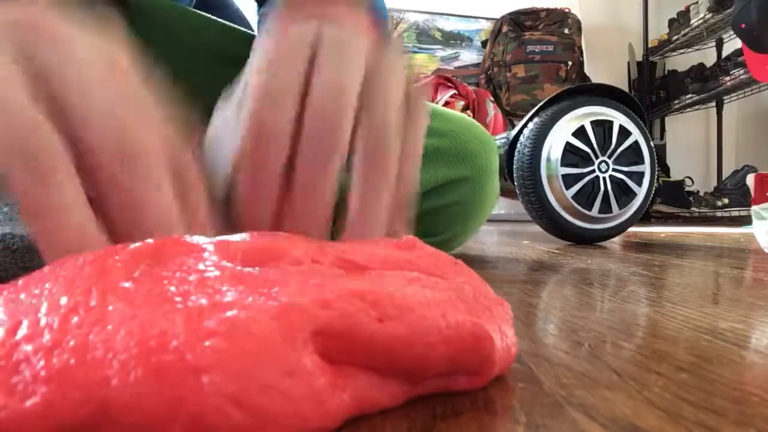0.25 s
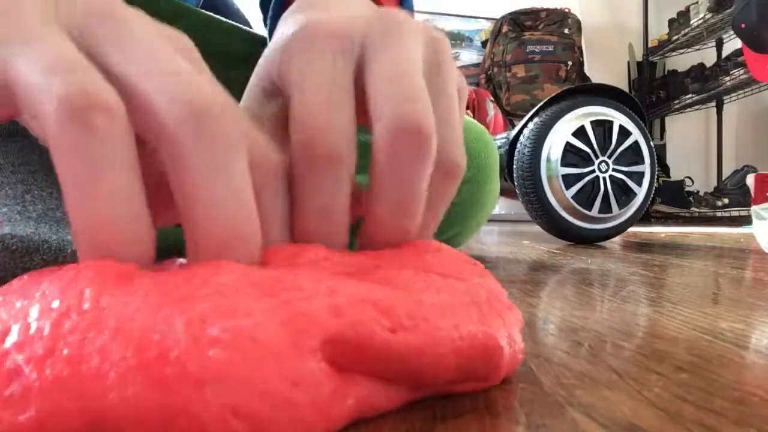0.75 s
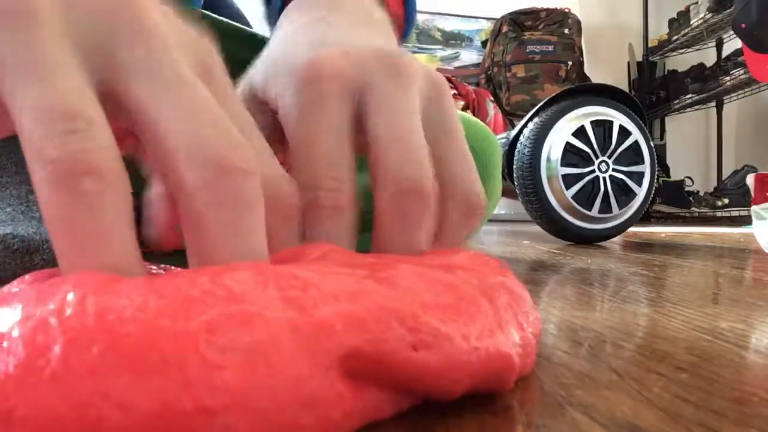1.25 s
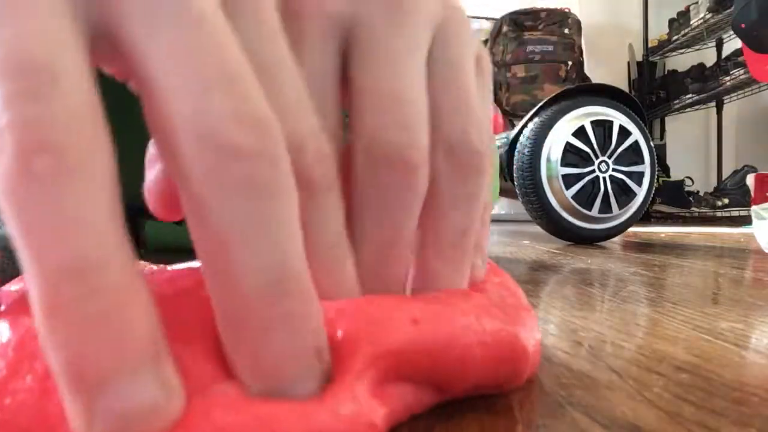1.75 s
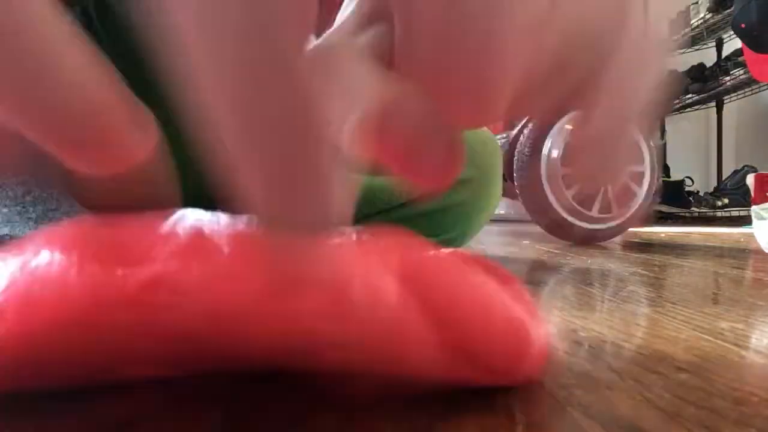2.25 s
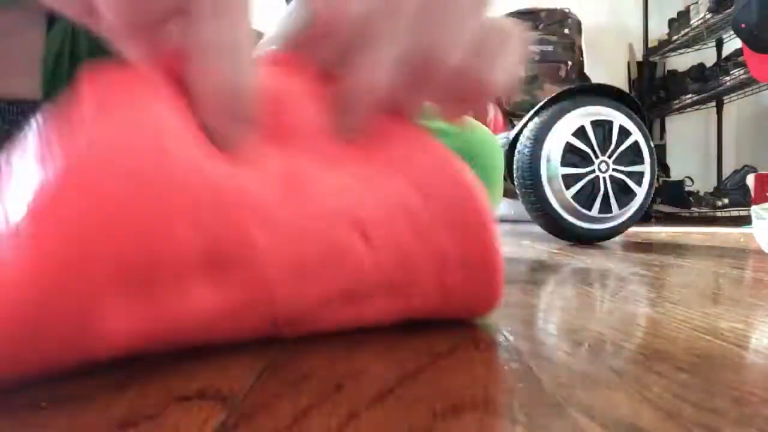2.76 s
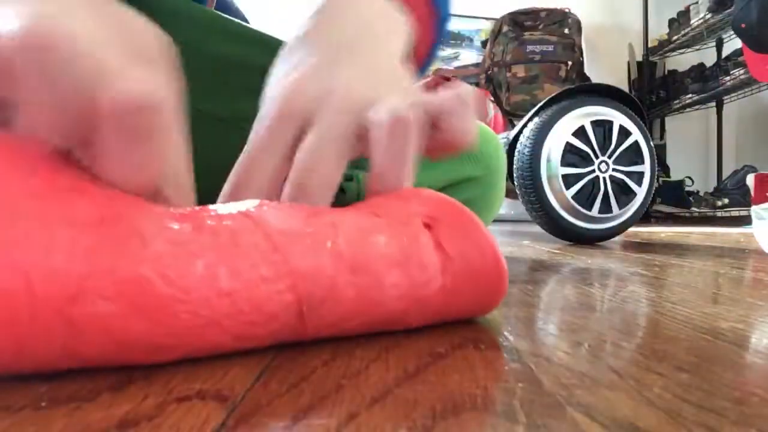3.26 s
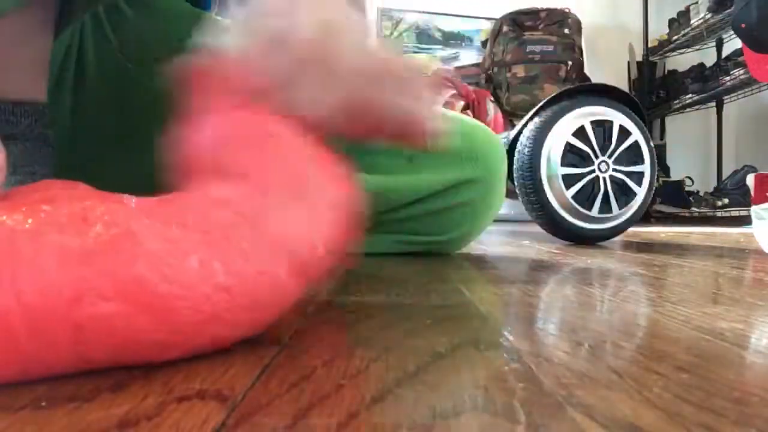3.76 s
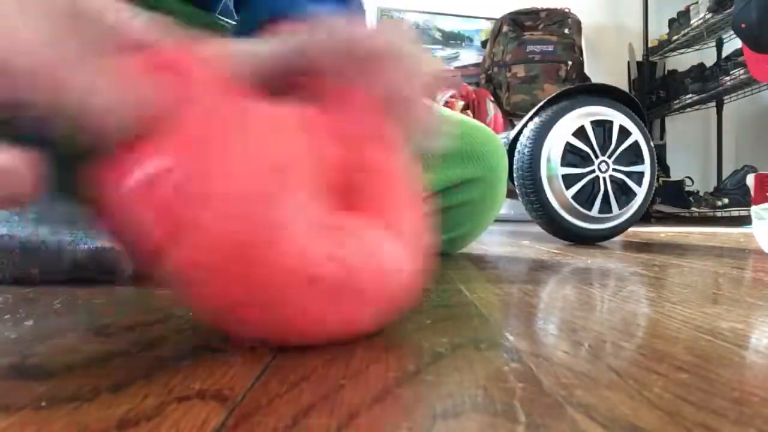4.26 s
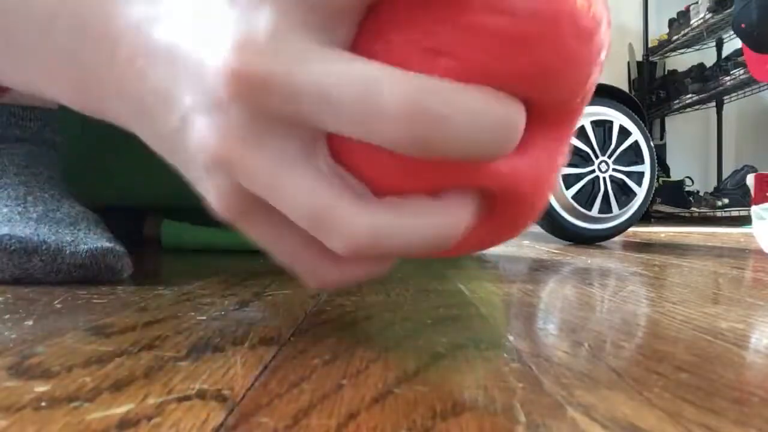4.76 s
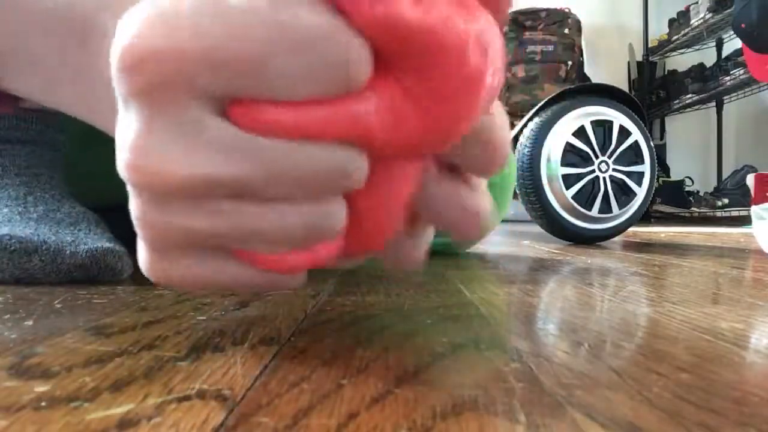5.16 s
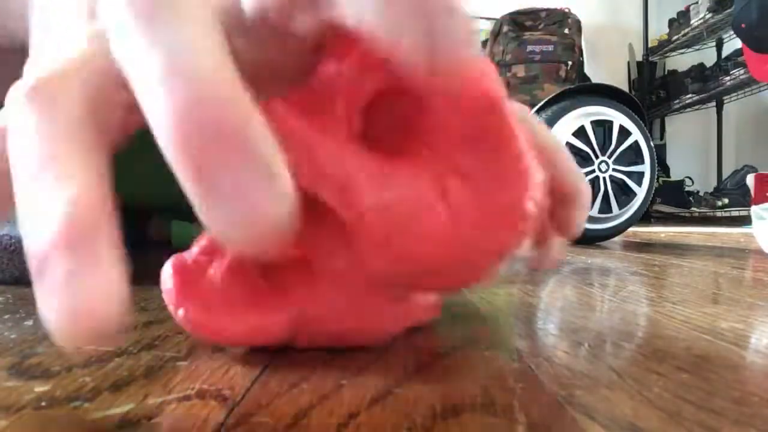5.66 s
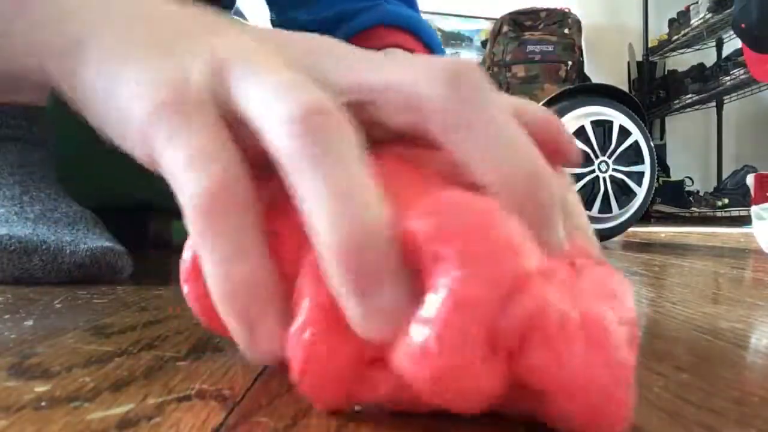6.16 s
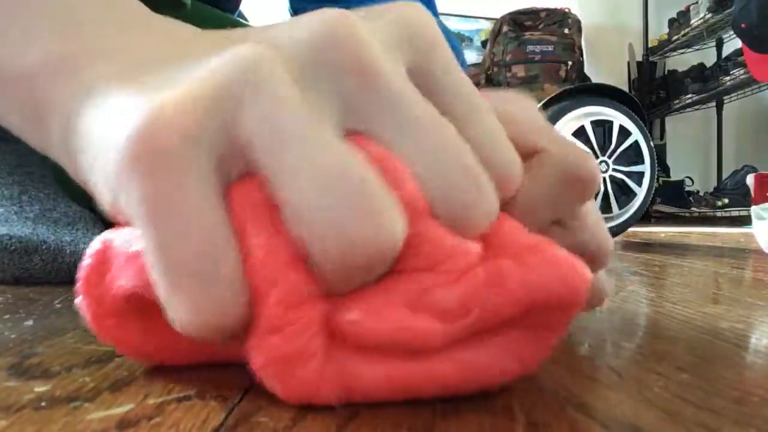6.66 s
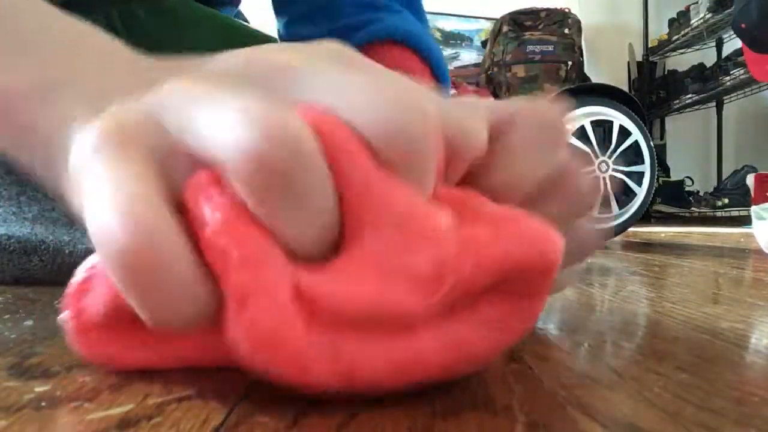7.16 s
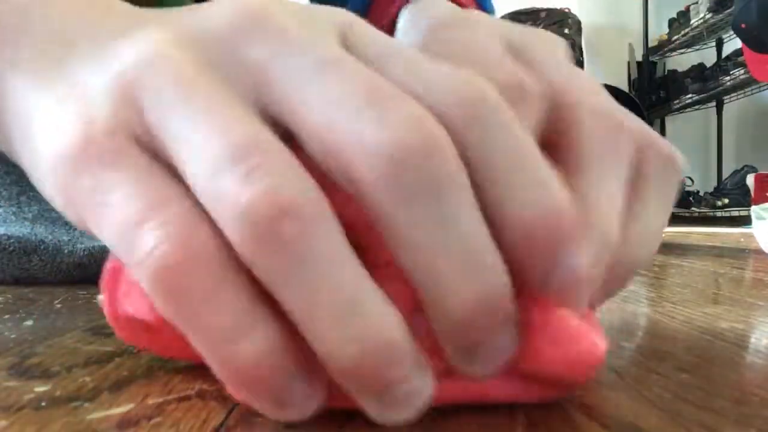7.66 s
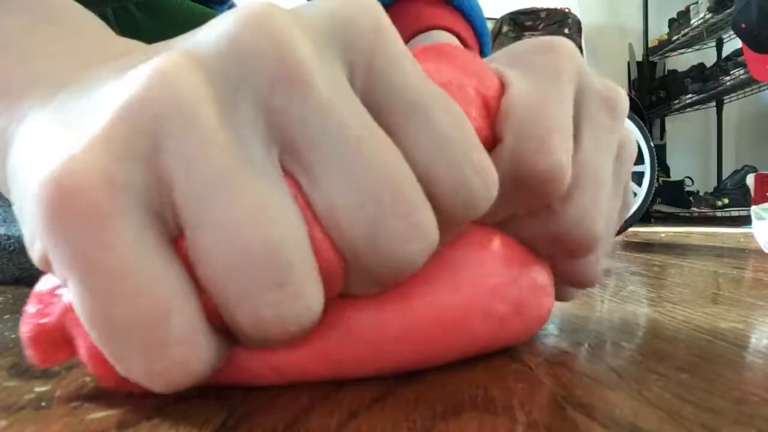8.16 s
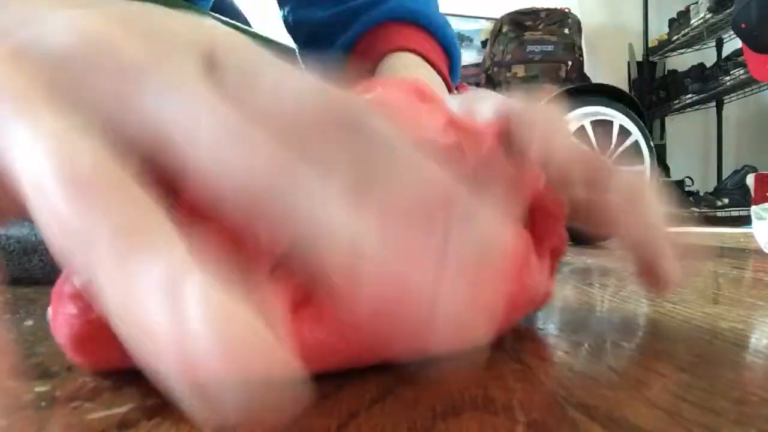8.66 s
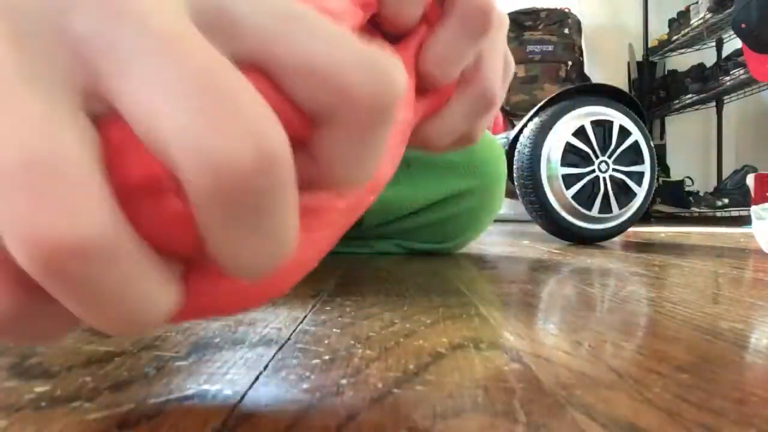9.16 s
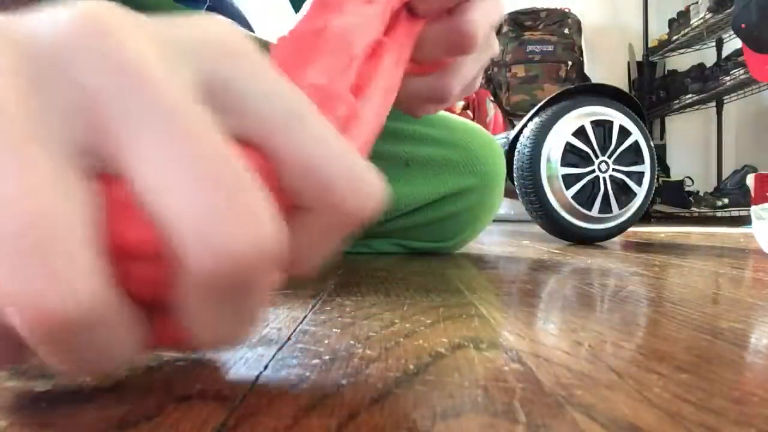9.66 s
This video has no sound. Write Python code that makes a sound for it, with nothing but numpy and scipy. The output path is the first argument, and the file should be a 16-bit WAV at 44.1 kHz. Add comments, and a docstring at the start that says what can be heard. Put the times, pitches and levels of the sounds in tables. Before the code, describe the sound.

Fingers poke and peel away from sticky slime with wet, tearing squelches, hollow plops and bright snaps. The lump thumps softly on wooden boards and is turned over, then squeezed in crackling bursts. The loudest cluster of bubble pops comes near the end, followed by a peel and faint stretching ticks. Heard very close in a quiet room with faint hum.

```python
"""A lump of slime is poked, kneaded and stretched by hands on a wooden floor, heard close up in a quiet room.
Bursting bubbles snap as short dispersed impulses, and opening air pockets plop as resonators sinking in pitch.
Peeling and kneading are random swarms of pockets, breaking threads and tiny bubbles under level curves.
Filtered noise gives the thuds on the boards and the still air; a wavering sine is the faint mains hum."""
import sys
import numpy as np
from scipy import signal
from scipy.fft import rfft, irfft, next_fast_len
from scipy.io import wavfile
from scipy.ndimage import map_coordinates

SR = 44100
rng = np.random.default_rng(int(sys.argv[2]) if len(sys.argv) > 2 else 0)


def wrap_up_sound(samples):
    """Save the sound to the file named by the first command line argument, as 16-bit audio."""
    columns = np.atleast_2d(samples).T
    # keep every value between -1 and 1, then stretch to whole-number steps
    tamed = np.clip(columns, -1, 1)
    steps = np.round(tamed * 32767).astype(np.int16)
    wavfile.write(sys.argv[1], SR, steps)


N = 437031  # samples

# frequency response shared by all bursting bubbles: f/Hz, level/dB
BUBBLE_COLOUR = [(100, 6), (2000, 1), (3600, 0), (5000, -3), (7000, 1), (9500, 1.5), (10400, -0.5),
                 (11500, 3.5), (16000, -3)]


def amp(db):
    """Level to amplitude: 20 dB is a factor of ten."""
    return 10 ** (np.asarray(db) / 20)


def unit(x):
    """Normalisation to an rms value of 1."""
    return x / np.sqrt(np.mean(x ** 2) + 1e-20)


def along(points, hz):
    """Linear interpolation of (f/Hz, value) points over the logarithm of frequency."""
    f, v = np.transpose(points)
    return np.interp(np.log(hz + 1), np.log(f + 1), v)


def coloured(x, spectrum):
    """Minimum-phase filtering: folding the cepstrum makes the filter causal, so attacks stay sharp."""
    m = 2 ** 13
    level_db = along(spectrum, np.fft.rfftfreq(m, 1 / SR))
    cepstrum = irfft(np.log(amp(level_db)), m)
    cepstrum[1:m // 2] *= 2
    cepstrum[m // 2 + 1:] = 0
    impulse_response = irfft(np.exp(rfft(cepstrum)), m)
    return signal.fftconvolve(x, impulse_response)[:N]


def add(track, s, sound):
    """Superposition: a sound is summed into the track from time s, in seconds."""
    part = track[max(0, round(s * SR)):][:len(sound)]
    part += sound[:len(part)]


def wobble(rate):
    """A smooth random curve: a spline through normally distributed knots, rate of them a second."""
    knots = rng.standard_normal(int(N * rate / SR) + 4)
    return map_coordinates(knots, [np.arange(N) * rate / SR])


def pocket(t, hz, cycles, drop):
    """Cavity resonance: an air pocket rings for a cycle or two and its pitch sinks as it widens."""
    age = t * hz / cycles
    # the pitch glides from (1 + drop) * hz towards (1 - drop) * hz
    phase = cycles * ((1 - drop) * age + 2 * drop * np.log1p(age))
    envelope = 2 * age * np.exp(1 - 2 * age)
    return np.sin(2 * np.pi * phase) * envelope


def pockets(rate, centre_hz, octaves, spread_db, cycles):
    """Granular superposition: rate small air pockets a second, of many sizes, scaled to rms 1."""
    when, a, b, strength = rng.random((int(rate * N / SR), 4)).T[..., None]
    hz = centre_hz * 2 ** (octaves * (a + b - 1))
    size = amp(spread_db * np.minimum(-np.log(strength), 3.5))
    k = np.arange(SR // 150)
    fade = 1 - (k / len(k)) ** 2
    grains = size * pocket(k / SR, hz, cycles, drop=0.24) * fade
    places = (when * N).astype(int) + k
    return unit(np.bincount(places.ravel(), grains.ravel(), N)[:N])


def ticks(rate, spread_db):
    """Impulse noise: threads of slime break at random moments, most of them weakly."""
    when, strength, sign = rng.random((int(rate * N / SR), 3)).T
    size = amp(spread_db * np.minimum(-np.log(strength), 4))
    return np.bincount((when * N).astype(int), size * np.sign(sign - .5), N)


def background():
    """Stationary sources: a slowly wavering mains tone and the broadband noise of still room air."""
    # spectrum of the air: f/Hz, level/dB
    air_spectrum = [(20, -19), (64, -5), (200, -12.5), (450, -22.5), (900, -21.5), (4500, -34),
                    (16000, -40.5)]
    tone = np.sqrt(2) * np.sin(2 * np.pi * 60 * np.arange(N) / SR)
    hum = amp(-64.5 + 2 * wobble(5.5)) * tone
    return hum + amp(-64.5) * unit(coloured(rng.standard_normal(N), air_spectrum))


def peels():
    """Adhesive failure: skin lifts off in jerks as pockets open and threads tear, then comes free."""
    # pulls of the skin: t/s at full pull, level/dB, rise/s over the last 20 dB, hold/s, tear brightness/dB
    pulls = [(0.316, -30, 0.022, 0.031, -2.5), (1.391, -29.5, 0.021, 0.027, -3),
             (2.295, -32, 0.038, 0.036, 7.5), (3.381, -35.5, 0.01, 0.046, 2.5),
             (5.616, -32.5, 0.14, 0.029, 5), (7.239, -32, 0.082, 0.098, 2), (8.584, -29, 0.062, 0.031, 5.5)]
    # spectra of the wet opening and of the tearing: f/Hz, level/dB
    squelch_spectrum = [(150, 2.5), (500, -5), (1100, -3), (2000, -9), (5000, -26), (15000, -49.5)]
    tear_spectrum = [(500, -20.5), (1500, 1), (3000, -0.5), (5000, -4), (11000, -7), (16000, -15)]
    settle_start_db, settle_s = -1.5, 0.046  # the sinking slime lingers: level, time to lose 20 dB
    t = np.arange(N) / SR
    wet, bright = np.zeros(N), np.zeros(N)
    for s, db, rise, hold, bright_db in pulls:
        swell_db = -20 * np.clip((s - t) / rise, 0, 10) ** 1.5
        sag_db = -4 * np.clip((t - s) / hold, 0, 1)
        free_db = -20 * np.clip((t - s - hold) / 0.028, 0, 10)
        settle_db = settle_start_db - 20 * np.clip((t - s - hold) / settle_s, 0, 10)
        pull_db = db + swell_db + sag_db
        wet += amp(pull_db + np.maximum(free_db, settle_db))
        bright += amp(pull_db + free_db + bright_db)
    swarm = pockets(rate=600, centre_hz=650, octaves=2.18, spread_db=2.0, cycles=2.64)
    squelch = unit(coloured(swarm, squelch_spectrum))
    tear = unit(coloured(ticks(rate=2400, spread_db=1.0), tear_spectrum))
    jerks = amp(2.8 * wobble(150))
    return jerks * (amp(-3.0) * wet * squelch + amp(-7.5) * bright * tear)


def snap(hz):
    """Dispersed impulse of energy 1: the skin cracks, the pitch dives as the cavity opens, the rim flutters."""
    crack_octaves, dive_cycles = 0.71, 0.595  # width; cycles while the pitch sinks by a factor e
    middle_cavity_hz, cavity_db, cavity_octaves = 1300, -4.5, 1.47  # the level is for a 5 kHz bubble
    t = np.arange(SR // 50) / SR
    f = np.fft.rfftfreq(len(t), 1 / SR) + 1
    crack = 1 / (1 + (np.log2(f / hz) / crack_octaves) ** 2)
    cavity_hz = middle_cavity_hz * np.exp(0.14 * rng.standard_normal())
    size = (5000 / hz) ** .7  # big bubbles have more body
    cavity = amp(cavity_db) * size / (1 + (np.log2(f / cavity_hz) / cavity_octaves) ** 2)
    # this phase delays low frequencies more than high ones
    dispersion = np.exp(-2j * np.pi * dive_cycles * np.log(f))
    dive = irfft((crack + cavity) * dispersion, len(t))[:len(t) // 2]
    flutter_decay = amp(-22.5) * np.exp(-t / 0.001) + 0.012 * np.exp(-t / 0.0079)
    flutter = rng.standard_normal(len(t)) * flutter_decay
    sound = np.convolve(dive, (t == 0) + flutter)
    return sound / np.linalg.norm(sound)


def snaps():
    """Impulsive release: trapped bubbles burst under the fingers, all with one common colouring."""
    # bursting bubbles: t/s, energy level/dB ahead of the common colouring, centre f/Hz
    bursts = [(0.305, -14, 4930), (0.3125, -2.5, 3730), (0.3235, -9.5, 5400), (0.8434, -27.5, 4200),
              (0.9948, -20, 6250), (1.0745, -2.5, 15300), (1.2956, -16.5, 15000), (1.7935, -15.5, 3100),
              (1.8374, -22, 5950), (2.391, -3.5, 1650), (2.584, -10.5, 5300), (3.3907, -4.5, 2870),
              (3.9563, -20.5, 3840), (4.0237, -18.5, 2500), (4.0779, -20.5, 3500), (4.0935, -15.5, 2520),
              (4.18, -19.5, 5560), (4.3997, -24, 1890), (4.802, -22, 2500), (4.816, -19, 2960),
              (5.065, -20, 7000), (5.0884, -15, 7040), (5.1923, -14.5, 5600), (5.2071, -9.5, 5260),
              (5.2642, -7, 2350), (5.275, -5.5, 4030), (5.311, -16.5, 4100), (5.328, -6, 4800),
              (5.3399, 5, 6000), (6.198, -20, 5780), (6.4953, -21, 1960), (6.601, -17, 1780),
              (6.665, -17, 8260), (6.685, -11.5, 6300), (6.7142, -13.5, 4800), (6.776, -14.5, 2400),
              (6.8187, -15.5, 5200), (6.847, -12, 4560), (6.8799, -12, 5270), (6.906, -18, 7640),
              (7.0103, -16.5, 7400), (7.6047, -22.5, 3570), (7.7425, 5.5, 8060), (7.7594, -10, 6500),
              (7.8299, -4, 7300), (7.8967, -13, 7870), (7.9491, -14, 5500), (8.026, -13, 6550),
              (8.0559, -20.5, 4200), (8.0902, -10.5, 6350), (8.1249, 7, 6960), (8.1379, 6.5, 4900),
              (8.2087, 4.5, 7000), (8.2286, -5.5, 6960), (8.2732, -0.5, 10630), (8.2855, 8.5, 3080),
              (8.2915, 0, 7160), (8.2945, -2, 7000), (8.305, 8, 4640), (8.3334, -3, 6600),
              (8.3846, 2, 10640), (8.4292, -.5, 5770), (8.9014, -26.5, 1620), (8.9896, -27, 3420),
              (9.1551, -23.5, 1200), (9.2092, -24, 11100), (9.2353, -19, 1680), (9.3445, -19.5, 10800),
              (9.5224, -20, 11300), (9.5443, -24, 11830), (9.6666, -28.5, 9700), (9.7238, -31.5, 1600),
              (9.7653, -29, 7200), (9.9, -17.5, 4500)]
    out = np.zeros(N)
    for s, db, hz in bursts:
        add(out, s, amp(db) * snap(hz))
    return coloured(out, BUBBLE_COLOUR)


def room(x):
    """Reverberation: furniture and walls return a faint, short tail whose colour turns steadily over time."""
    # reverberation time of the room: f/Hz, t60/s
    decay_times = [(150, 0.66), (1000, 0.31), (6000, 0.41), (15000, 0.16)]
    hz, t, z = signal.stft(rng.standard_normal((3, SR // 2)), SR, nperseg=256)
    decay = amp(-60 * t / along(decay_times, hz)[:, None])
    tails = signal.istft(z * decay, SR, nperseg=256)[1]
    first_delay = SR // 300  # samples
    tails = np.pad(tails / np.linalg.norm(tails[0]), ((0, 0), (first_delay, 0)))
    # three weights in rotation share the sound among three tails at constant total power
    turn = 2.3 * np.arange(N) / SR + np.arange(3)[:, None] / 3
    place = np.cos(np.pi * turn) * np.sqrt(2 / 3)
    return signal.fftconvolve(place * x, tails, axes=1)[:, :N].sum(axis=0)


def plops():
    """Cavity resonance: larger pockets open and plop; through a narrow opening they ring longer and squeak."""
    # air pockets opening: t/s, envelope peak level/dB, f/Hz
    openings = [(0.316, -33, 486), (1.379, -24, 1260), (1.38, -25.5, 440), (1.397, -16, 500),
                (1.416, -26.5, 454), (2.264, -28.5, 1240), (2.390, -14, 1130), (2.491, -31.5, 138),
                (3.392, -25, 400), (3.396, -22.5, 219), (3.412, -27, 447), (3.619, -41, 183),
                (4.024, -40.5, 307), (4.472, -39, 278), (5.524, -30, 487), (5.558, -31, 303),
                (5.621, -23, 1110), (7.248, -22.5, 553), (7.301, -22.5, 880), (8.123, -28.5, 188),
                (8.138, -24, 683), (8.286, -34, 169), (8.307, -37, 150), (8.575, -22, 650)]
    # air squeaking out through a narrow opening: t/s, envelope peak level/dB, f/Hz
    narrow_openings = [(4.202, -37, 1650), (6.044, -42.5, 1620), (9.448, -31, 1350)]
    out, t = np.zeros(N), np.arange(SR // 12) / SR
    for s, db, hz in openings:
        add(out, s, amp(db) * pocket(t, hz, cycles=1.4, drop=.4))
    for s, db, hz in narrow_openings:
        add(out, s, amp(db) * pocket(t, hz, cycles=2.6, drop=.22))
    return out


def swell(s, db, half):
    """A cusped level curve in dB about time s, 14 dB down at the half length."""
    distance = np.abs((np.arange(N) / SR - s) / half)
    return db - 14 * distance ** 0.66


def handwork():
    """Effort and cling in dB: the powers of all moves add, and cling is their power-weighted mean."""
    # slow squeezes: start t/s, let-go t/s, final level/dB, rise from start to let-go/dB (negative: a fall),
    # cling/dB (favours crackle over squish)
    squeezes = [(0.72, 1.36, -67, 5.5, -1), (1.683, 2.2, -72.5, -4, 4), (3.634, 4.45, -85, -11, 15),
                (4.804, 5.365, -51.5, 10.5, 1), (5.432, 5.8, -60, 12, -0.5), (6.341, 6.89, -56.5, 4, 1.5),
                (6.926, 7.205, -67.5, -10, 5), (7.595, 8.339, -44, 18.5, 5.5), (8.92, 9.92, -72.5, -5, 7.5)]
    # quick strokes that poke, roll and turn the lump: t/s, peak level/dB, half length/s
    strokes = [(0.853, -50, 0.014), (2.604, -45.5, 0.067), (2.709, -48.5, 0.043), (2.793, -45.5, 0.032),
               (2.989, -58.5, 0.14), (3.776, -55, 0.19), (3.922, -44.5, 0.013), (3.996, -49.5, 0.059),
               (4.216, -43, 0.014), (4.3, -53, 0.19), (4.608, -50.5, 0.048), (4.666, -50.5, 0.027),
               (4.815, -57, 0.066), (4.937, -45.5, 0.012), (5.692, -38.5, 0.015), (5.938, -56, 0.031),
               (6.078, -53.5, 0.018), (6.232, -47.5, 0.028), (8.837, -49, 0.078)]
    grip_db_per_s, let_go_db_per_s, stroke_cling_db = 445, 270.5, 0
    t = np.arange(N) / SR
    moves = []
    for start, end, db, build_db, cling_db in squeezes:
        pressure_db = db - build_db * np.clip((end - t) / (end - start), 0, 1)
        grip_db = grip_db_per_s * np.maximum(start - t, 0)
        let_go_db = let_go_db_per_s * np.maximum(t - end, 0)
        moves.append((pressure_db - grip_db - let_go_db, cling_db))
    for s, db, half in strokes:
        moves.append((swell(s, db, half), stroke_cling_db))
    power, cling = np.zeros(N), np.zeros(N)
    for level_db, cling_db in moves:
        share = amp(np.maximum(level_db, -120)) ** 2
        power += share
        cling += share * cling_db
    return 10 * np.log10(power), cling / power


def pinpricks(level_db, rate, spread_db):
    """Random impulsive release: tiny bubbles of assorted sizes burst, rate of them a second."""
    lowest_hz, octaves = 1764, 2.34  # centre of the largest bubbles, range of sizes
    out = np.zeros(N)
    for when, strength, pitch in rng.random((int(rate * N / SR), 3)):
        db = level_db[int(when * N)] + spread_db * strength ** 2
        add(out, when * N / SR, amp(db) * snap(lowest_hz * 2 ** (octaves * pitch)))
    return coloured(out, BUBBLE_COLOUR)


def kneading():
    """Stick-slip: pressed slime squishes; where it clings, separate threads and pinpricks take over."""
    # spectra of the squish and of the breaking threads: f/Hz, level/dB
    squish_spectrum = [(100, 2.5), (250, 0), (1400, 0.5), (3000, -8), (6000, -20), (15000, -38.5)]
    crackle_spectrum = [(600, -12.5), (2000, -1), (3600, -4), (5000, -4.5), (7000, -3.5), (13000, -7),
                        (16000, -18.5)]
    squish_db, threads_db, pops_db, blips_db = -1, -0.5, 20, -3.5  # each layer against the effort
    effort_db, cling_db = handwork()
    slip_db = 2 * wobble(28) + 2.8 * wobble(170)
    swarm = pockets(rate=450, centre_hz=1100, octaves=2.4, spread_db=4, cycles=1.4)
    squish_gain = amp(effort_db + slip_db - 1.1 * cling_db + squish_db)
    squish = squish_gain * unit(coloured(swarm, squish_spectrum))
    threads_gain = amp(effort_db + slip_db + 0.055 * cling_db + threads_db)
    threads = threads_gain * unit(coloured(ticks(rate=2000, spread_db=0.7), crackle_spectrum))
    pops = pinpricks(effort_db + cling_db + pops_db, rate=100, spread_db=14)
    stray = pockets(rate=60, centre_hz=1250, octaves=1.6, spread_db=3, cycles=1.3)
    blips = amp(effort_db + blips_db) * stray
    return squish + blips + threads + pops


def bumps():
    """Damped impact: the soft lump lands on the boards as a dull noise burst with exponential decay."""
    # landings: t/s, nominal peak level/dB
    landings = [(1.424, -31.5), (2.333, -29), (2.391, -26.5), (2.511, -37.5), (3.396, -35), (8.799, -37.5)]
    # response of the floorboards: f/Hz, level/dB
    boards_response = [(25, -15), (60, -7), (150, -6), (260, -11.5), (600, -34), (3000, -43)]
    out, t = np.zeros(N), np.arange(SR // 6) / SR
    for s, db in landings:
        # 22.5 dB makes up for the loss in the boards
        add(out, s, amp(db + 22.5) * np.exp(-t / 0.015) * rng.standard_normal(len(t)))
    return coloured(out, boards_response)


def drags():
    """Amplitude modulation: the lump drags as it is turned over, a swarm of low pockets gurgling wetly."""
    # drags over the boards: t/s, peak level/dB, half length/s
    turns = [(4.502, -51.5, 0.034), (4.886, -37.5, 0.013), (4.948, -45.5, 0.02)]
    gurgle = pockets(rate=500, centre_hz=323, octaves=0.94, spread_db=2, cycles=2.2)
    return sum(amp(swell(*row)) for row in turns) * gurgle


def scene():
    """Superposition of the direct sound of the slime, its reverberation and the background."""
    slime = snaps() + plops() + bumps() + drags() + peels() + kneading()
    answer = amp(-20) * room(slime)
    return (slime + answer + background())[None]


def record(dry):
    """Limiting in level and band: the recorder clips at full scale, then keeps nothing above 16.3 kHz."""
    top_hz = 16300
    m = next_fast_len(N + SR // 4)
    passband = np.fft.rfftfreq(m, 1 / SR) < top_hz
    return irfft(rfft(np.clip(dry, -1, 1), m) * passband, m)[:, :N]


dry = scene()
out = record(dry)
wrap_up_sound(out)
```